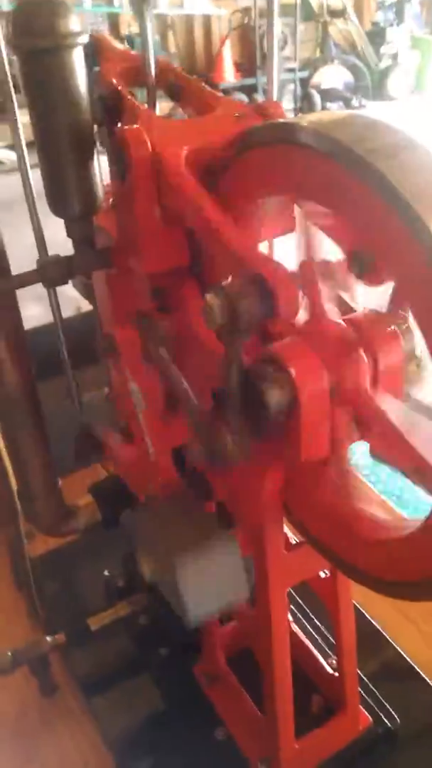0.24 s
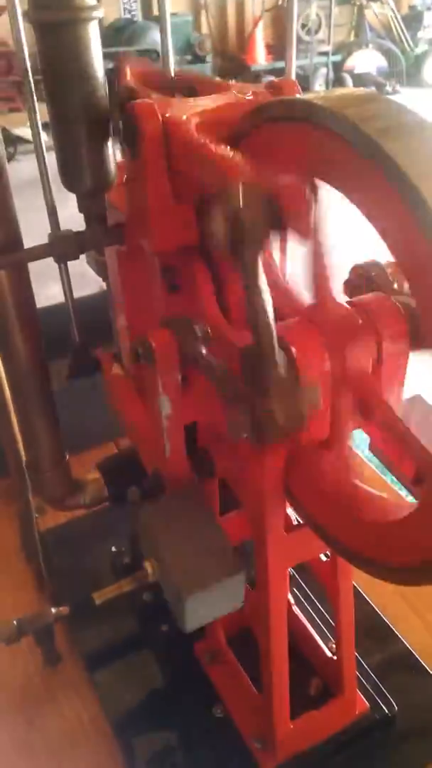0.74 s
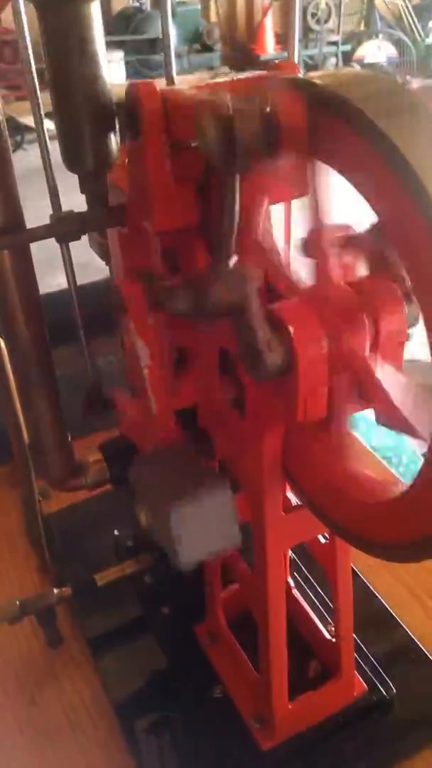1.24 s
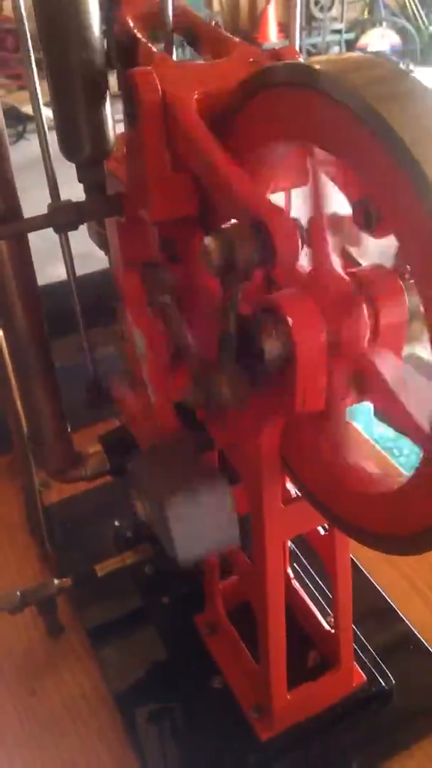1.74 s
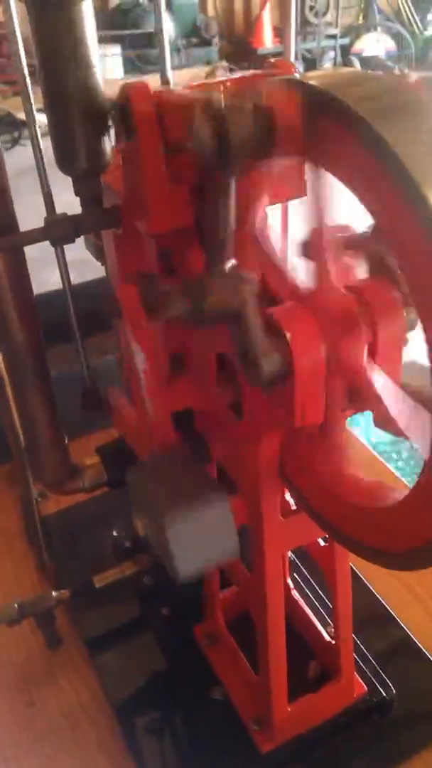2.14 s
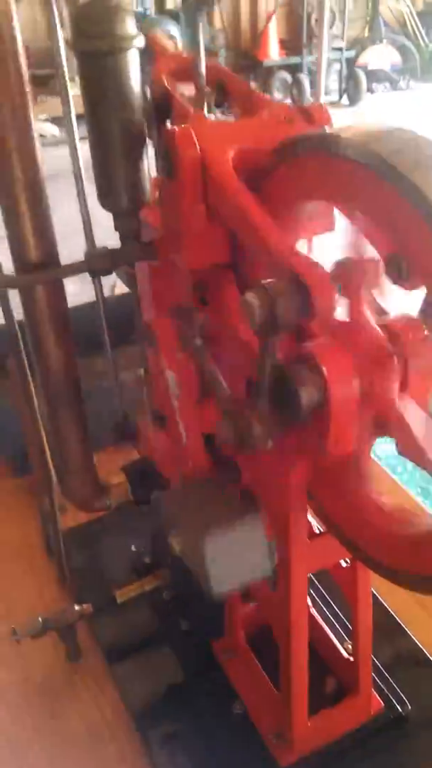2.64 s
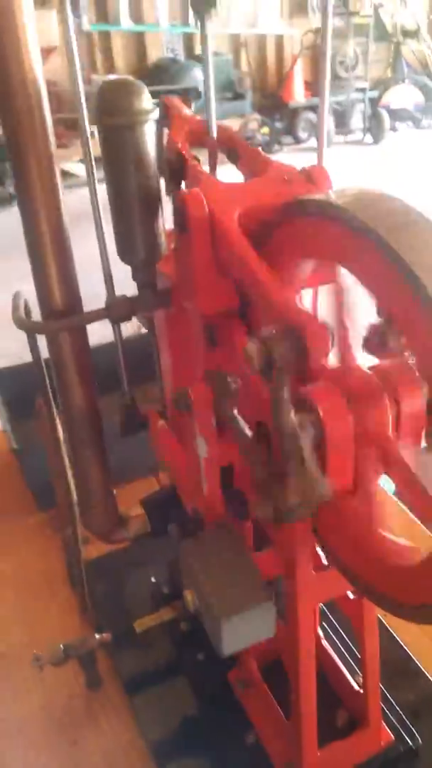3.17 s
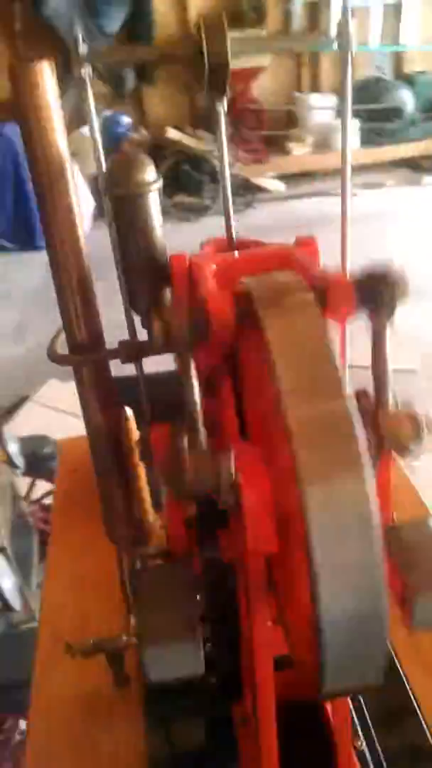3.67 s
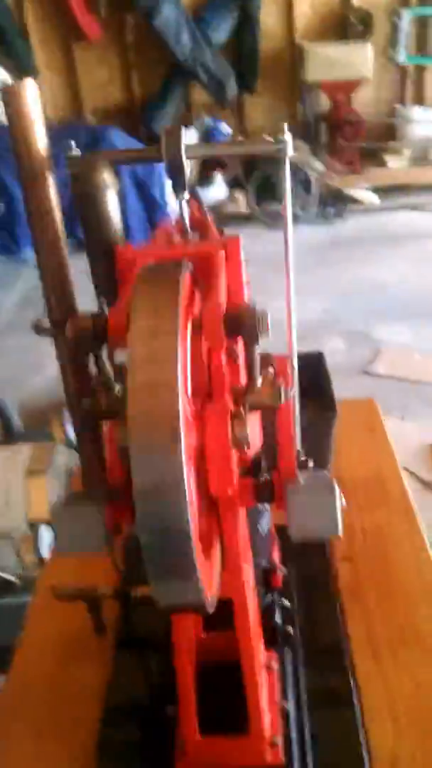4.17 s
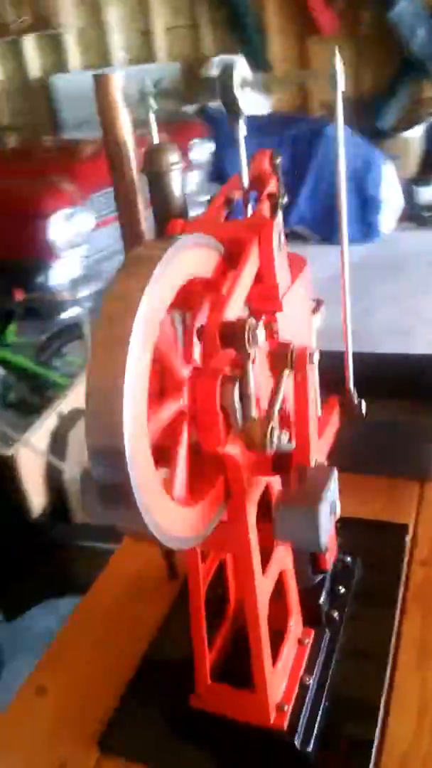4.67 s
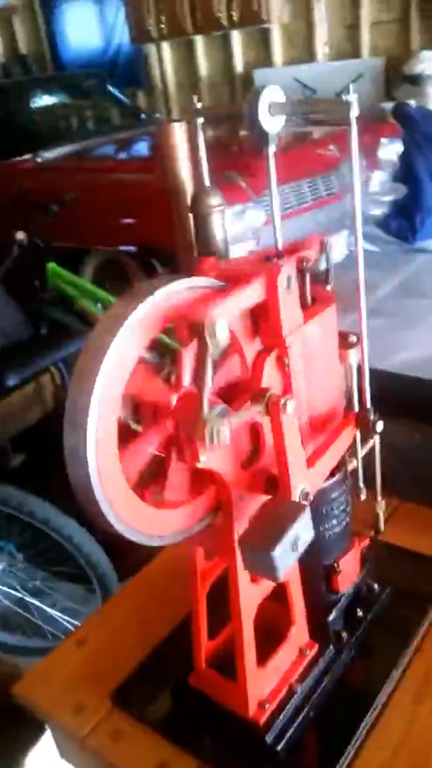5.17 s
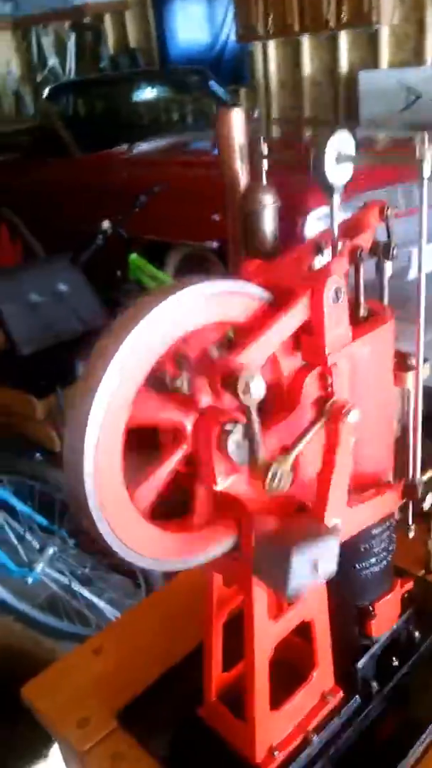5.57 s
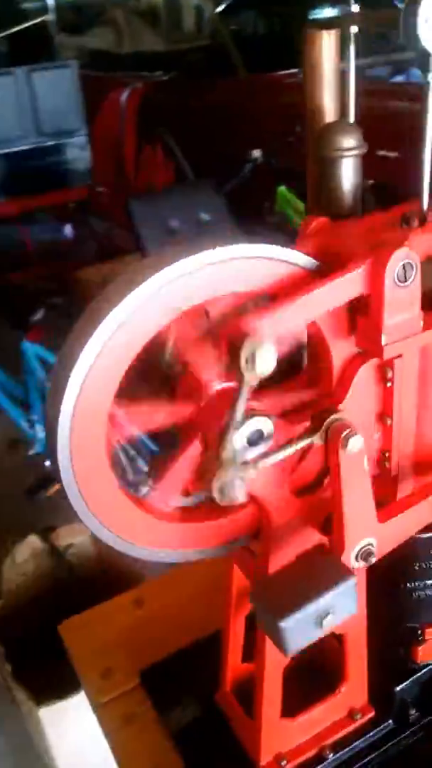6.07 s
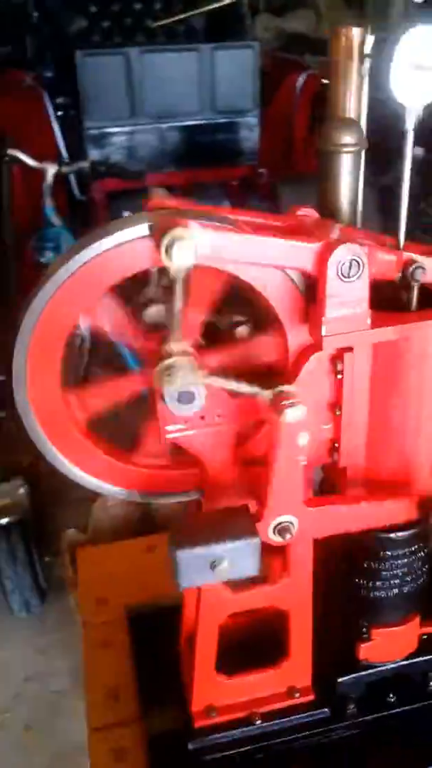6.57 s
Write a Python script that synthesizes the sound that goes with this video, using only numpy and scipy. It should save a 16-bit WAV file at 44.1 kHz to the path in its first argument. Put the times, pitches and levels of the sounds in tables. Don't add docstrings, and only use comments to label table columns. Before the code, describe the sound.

Close to a small running engine on a wooden table in a garage. About three times a second a dry metal knock lands, surrounded by crisp, irregular link ticks and soft low thuds from the table top. Bearings rustle steadily and a very faint motor hums far off. The hand-held stereo microphone moves around it, with faint shoe scuffs and handling bumps; the room echo is short.

```python
import sys
import numpy as np
from scipy import signal
from scipy.fft import rfft, irfft, next_fast_len
from scipy.io import wavfile

SR = 44100
rng = np.random.default_rng(int(sys.argv[2]) if len(sys.argv) > 2 else 0)


def put_to_file(sound):
    columns = np.atleast_2d(sound).T
    safe = np.clip(columns, -1, 1)
    whole_steps = np.round(safe * 32767)
    wavfile.write(sys.argv[1], SR, whole_steps.astype(np.int16))


def nominal_scale(level):
    x = np.asarray(level, float) / 20
    return 10 ** x


N = 300482

# frequency_hz, density_db (per Hz)
RUNNING_COLOUR = [(25, -8.5), (70, -12.5), (180, -15.5), (280, -3), (420, -13.5), (1200, -17), (1600, -20),
                  (2300, -20.5), (3600, -21.5), (6000, -27), (9000, -27), (15000, -35)]
# cycles_per_turn, depth_db, angle_rad
RUB_BY_ANGLE = [
    (1, 0.5, 3),
    (3, 1, 0.69),
    (4, 0.94, 1.64),
]
# frequency_hz, density_db (per Hz)
WIND_COLOUR = [(20, 0), (45, -2), (70, -9), (200, -17), (500, -32), (15000, -70)]
# frequency_hz, density_db (per Hz)
HISS_COLOUR = [(600, -15), (1300, 7), (1900, -10), (2500, 0), (4000, -28), (8000, 2), (15000, -6)]
# time_s, pitch_hz, level_db
MOTOR_COURSE = [(0, 78, -54), (.23, 79, -44.5), (1.01, 79.5, -48), (3.5, 86.1, -48), (4.1, 87, -48.5),
                (5.35, 88, -55.5), (6.81, 80, -60)]
# full_weight_s, level_db, lean_in_s, lift_off_s
SCUFFS = [
    (3.654, -51, 0.033, 0.014),
    (3.977, -49, 0.022, 0.076),
    (6.58, -51.5, 0.097, 1),
]
# frequency_hz, density_db (per Hz)
SCUFF_COLOUR = [(300, -17), (1000, -18), (3500, -14.5), (7000, -15), (15000, -23.5)]
# crest_s, level_db
FINGER_BUMPS = [(0.133, -20), (0.219, -26), (0.291, -28), (0.524, -20), (0.548, -29), (1.178, -30.0),
                (1.255, -20), (1.331, -30), (1.419, -24), (1.817, -20), (2.52, -30), (3.355, -21),
                (3.404, -16), (3.432, -25), (3.456, -14), (3.497, -23), (3.525, -22), (3.553, -32),
                (3.88, -24), (5.993, -30), (6.295, -30)]
# frequency_hz, level_db, t60_s
BODY_MODES = [(193, -2, 0.13), (381, -4, 0.21), (451, 1.5, 0.1), (552.4, -5.5, 0.51), (721, -6, 0.079),
              (1164, -4, 0.17), (1334, -8, 0.047), (3760, -17, 0.014), (5850, -6.5, 0.015),
              (8500, -10, 0.0073)]
# crest_turn_share, pitch_hz, upward_scoop (0-1)
PUSHES = [
    (0.075, 286.6, 0.13),
    (0.691, 267, 0.59),
    (0.825, 287, 0.13),
]
# recoil_db, lead_in_db, main_db
PUSH_LEVELS = [(-68, -21.5, -29), (-25.5, -19.5, -18), (-28, -23.5, -23), (-27.5, -22, -20.5),
               (-27.5, -24.5, -24), (-30, -26, -20), (-31, -26, -23), (-24.5, -28.5, -26.5),
               (-26.5, -25, -23.5), (-26, -31, -20), (-26.5, -23.5, -21.5), (-18, -24, -21.5),
               (-25, -24.5, -19.5), (-22, -28, -21), (-20.5, -27, -22), (-23, -29.5, -20.5),
               (-23, -26, -27), (-23, -25.5, -22), (-20.5, -32, -21), (-23, -29, -22), (-19, -26, -22.5),
               (-25, -32, -24), (-24.5, -24.5, -23.5), (-15, -60, -60)]
# crest_s, level_db
ROCKS = [(0.063, -30.5), (0.361, -28), (0.657, -29), (.689, -30), (0.949, -26), (1.271, -36), (1.524, -30),
         (1.572, -23.5), (1.826, -27.5), (2.146, -26), (2.446, -24.5), (2.723, -24.5), (3.015, -26),
         (3.048, -29), (3.314, -27.5), (3.354, -32), (3.641, -24.5), (3.925, -25), (4.259, -26),
         (4.508, -27), (4.838, -26), (5.08, -32), (5.112, -29), (5.337, -41), (5.693, -28.5),
         (5.952, -25.5), (5.983, -25.5), (6.24, -25.5), (6.55, -25.5), (6.593, -32.5)]
# start_s, level_db
ROD_PINGS = [(0.0084, -58), (0.3097, -57), (0.6095, -71), (0.9103, -57), (1.21, -49.5), (1.511, -59),
             (1.8078, -62), (2.106, -72), (2.4034, -63), (2.703, -59)]
# start_s, snap_db, pin_rattle_db, snap_centre_hz, top_edge_db
EARLY_TICKS = [(0.0335, -41.5, 6, 5880, -12), (0.0623, -32, -2, 8900, -14), (0.1224, -32, -14, 5860, -26),
               (0.1748, -35.5, 2.5, 5700, -21), (0.2805, -45, -9, 6620, -3), (0.3077, -33, -0.5, 9650, -14),
               (0.3374, -36, 2, 5990, -16), (0.383, -39, -1, 6180, -5), (0.4214, -31.5, -4, 5600, -20),
               (0.472, -32, -2.5, 6170, -17), (0.5831, -48, -10, 6480, -5), (0.609, -40, 3, 4730, -14),
               (0.634, -32.5, -2, 5990, -17), (0.701, -32, -9, 6190, -7), (0.7245, -30.5, -1, 7400, -16),
               (0.7677, -35.5, 2, 5960, -22), (0.9093, -37, -3.5, 9650, -14),
               (0.9342, -25.5, -13, 5820, -20), (0.9914, -31, -10, 6730, -11), (1.0223, -45, -17, 5820, -24),
               (1.0665, -38, -1, 5570, -15), (1.1117, -50, -2, 6740, -6), (1.1762, -48, -14, 6050, 2),
               (1.1956, -48, -12, 5990, -16), (1.2084, -31.5, 0.5, 9650, -18), (1.2338, -26, -10, 7970, -19),
               (1.261, -40, -9, 8580, -7), (1.2744, -47, -16, 6440, -6), (1.319, -54, -19, 5830, -13),
               (1.3653, -31.5, -4.5, 5730, -25), (1.4107, -49, -10, 6600, -18), (1.482, -48, -8, 6540, -7),
               (1.508, -39.5, 0.5, 9570, -20), (1.5344, -50, -8, 5730, -19), (1.5687, -29, -6.5, 6760, -28),
               (1.5968, -30.5, -6.5, 5660, -10), (1.672, -34.5, -8, 6050, -19),
               (1.8332, -39, -16, 5910, -23), (1.8941, -36, -3, 5810, -4), (1.918, -31, -0.5, 5750, -18)]
# start_s, snap_db, pin_rattle_db, snap_centre_hz, top_edge_db
MIDDLE_TICKS = [(1.9659, -29.5, -6, 6130, -22), (2.0083, -49, -13, 7070, -12), (2.0892, -44, -7, 5880, -3),
                (2.1301, -40, -1, 5800, -11), (2.175, -40.5, -2, 6430, -7), (2.2164, -40, -3, 5930, -15),
                (2.4029, -40.5, 3.5, 9660, -17), (2.4952, -35, -8.5, 5750, -7),
                (2.5333, -39.5, -3.5, 6030, -7), (2.7007, -39, 2, 9640, -12), (2.7262, -31, -23, 7360, -16),
                (2.7556, -39, 4.5, 8690, -15), (2.791, -35, -13, 5760, -7), (2.81, -34.5, -6, 6030, -14),
                (2.8264, -39.5, -0.5, 8030, -12), (2.8585, -30.5, -9.5, 6140, -23),
                (2.9502, -25.5, -8, 8500, -18), (2.9776, -43, 4, 5870, -5), (3.004, -34.5, -1, 5810, -15),
                (3.0789, -35, -7, 5960, -11), (3.107, -31, -14, 6180, -20), (3.1547, -30, -11.5, 6170, -22),
                (3.269, -40, -2, 5280, -7), (3.2928, -42, -1.5, 4750, -15), (3.3189, -34, -13, 5720, -19),
                (3.3467, -36, -27, 8690, -15), (3.377, -39, -19, 7130, -6), (3.4017, -32, -16, 6150, -15),
                (3.4407, -39, -4, 5720, -13), (3.4531, -28.5, -8.5, 6250, -20), (3.5654, -44, -2, 5670, -8),
                (3.6127, -33.5, -5, 5480, -16), (3.6356, -30, -13, 5380, -21), (3.6999, -38.5, 1.5, 5780, -14),
                (3.749, -31, -6.5, 5900, -22), (3.8831, -35.5, 0, 9050, -17), (3.908, -37, -4, 6660, -17),
                (3.9509, -38, -9, 6600, -14), (3.9664, -25.5, -20, 6170, -15), (4.2003, -37, -0.5, 9630, -9)]
# start_s, snap_db, pin_rattle_db, snap_centre_hz, top_edge_db
LATE_TICKS = [(4.2695, -34, -8, 6630, -16), (4.349, -34, -12, 6200, -20), (4.4947, -32, -6, 8730, -16),
              (4.5461, -44, -19, 5800, -8), (4.5774, -51, -22, 5430, -13), (4.63, -45, -16, 6230, -18),
              (4.7558, -38, -1, 8260, -10), (4.8487, -34, -4, 4900, -9), (4.884, -32.5, -15, 6490, -15),
              (4.9233, -31.5, -10, 5980, -23), (5.0605, -38, -1, 7960, -18), (5.15, -33, -20, 4700, -8.5),
              (5.1684, -39, 0, 8830, -8), (5.191, -39, -17, 5470, -10), (5.3233, -41, -6, 5700, -9),
              (5.3492, -44, 4, 5500, -15), (5.408, -40, -16, 8500, -11), (5.4416, -32.5, -12, 5800, -8),
              (5.4817, -35, -14, 5810, -11), (5.641, -43, -1, 4750, -19), (5.7287, -31, -10, 5700, -11),
              (5.7705, -38, -12, 5550, -9), (5.795, -34, -9, 6140, -22), (5.9254, -39, -5, 8450, -11),
              (5.9788, -37, -20, 5760, -9), (6.0062, -32.5, -22, 5670, -10), (6.032, -40, -15, 5910, -10),
              (6.079, -34, -8, 5820, -19), (6.125, -28, -21, 8700, -25), (6.193, -46, -15, 6060, -3),
              (6.226, -29.5, -10, 6500, -11), (6.2945, -27.5, -23, 8500, -16), (6.3644, -40, -13, 6070, -18),
              (6.378, -25, -19, 6060, -31), (6.5141, -33, -19, 5830, -13), (6.574, -36, -13, 5790, -6),
              (6.664, -46, -13, 6210, -16), (6.7725, -31, -7, 5850, -15), (6.7838, -22, -14, 5760, -27)]
# start_s, snap_db, pin_rattle_db, snap_centre_hz, top_edge_db
EXTRA_TICKS = [(0.0034, -38.5, -1.5, 9660, -9), (0.07, -36.5, 0.5, 4560, -13), (0.132, -45, -4, 7530, -19),
               (0.4946, -49, 10, 5870, -10), (0.662, -39, 3, 5520, -17), (0.7396, -43, 4.5, 5760, -6),
               (1.075, -40, -1.5, 5600, -13), (1.3046, -53, -18, 5830, -7), (2.069, -50, -13, 5630, -5),
               (2.1056, -46, 0, 4700, -6), (2.1644, -45, 3, 6030, -11), (2.2592, -38, 1.5, 5660, -16),
               (2.379, -49, -18, 4690, -4), (2.428, -37, -9, 5880, -18), (2.5153, -35, -4, 5710, -14),
               (2.8993, -51, -20, 5860, -21), (3.5882, -36, -1.5, 4720, -18), (3.659, -47, -14, 6270, -18),
               (3.68, -32, -6, 5800, -20), (3.7698, -43, 4, 8770, -14), (4.0398, -36, -4, 6240, -25),
               (4.2337, -42, -3, 6450, -15), (5.213, -37, -24, 5640, -21), (5.5034, -36, -10, 6940, -15),
               (5.6635, -42, 1, 5500, -18), (6.2114, -40, -10, 5630, -11), (6.2497, -32, -19, 6420, -13)]
# low_hz, high_hz
SNAP_BANDS = [
    (4800, 6300),
    (6800, 9000),
    (10500, 20000),
]
SNAP_RISE_S = [.003, .0028, .002]
# start_s, level_db, frame_ring_db, bright_ring_db, favoured_pitch_hz
KNOCKS = [(0.2323, -19.5, -3, -14.5, 1480), (0.534, -20, 0.5, -8, 680), (0.8319, -19, -3, -11.5, 1186),
          (1.1327, -21.5, 0, -12, 675), (1.4335, -19, -4.5, -10.5, 738), (1.732, -19, -8, -3, 1350),
          (2.0298, -20, -2, -14.5, 1440), (2.3277, -21.5, -3.5, -8.5, 1210), (2.6263, -18, -1, -11, 1240),
          (2.9233, -19.5, -7, -11, 740), (3.2196, -18, -6.5, -12, 1150), (3.5134, -18, -2.5, -15.5, 1182),
          (3.8091, -21.5, 1, -14, 740), (4.1029, -19, -2, -20, 880), (4.3968, -20.5, -3, -13.5, 1013),
          (4.6893, -25.5, 2.5, -10, 875), (4.9832, -22.5, -1, -12.5, 1220), (5.2761, -23, -0.5, -9.5, 740),
          (5.5652, -19, -2.5, -15, 1380), (5.8551, -20, -1, -10, 1155), (6.1446, -20.5, -3, -10, 1300),
          (6.4318, -21, -0.5, -10.5, 745), (6.721, -19, -3.5, -16, 1300)]
# frequency_hz, level_db, t60_s
FRAME_MODES = [(460, -4, .04), (590, -3, .035), (740, -2, .035), (880, -3, .03), (1020, -5, .025),
               (1110, -5, .02), (1190, -3, .022), (1260, -5, .02), (1340, -3, .022), (1480, -3, .022),
               (1600, -7, .015), (1750, -8, .015)]
# frequency_hz, level_db, t60_s
PIN_MODES = [(2200, -4, .008), (2550, -2, .008), (2850, -2, .008), (3150, -2, .008), (3450, 0, .01),
             (3800, -1, .009), (4200, -4, .007), (4700, -3, .009)]
# frequency_hz, level_db, t60_s
BRIGHT_MODES = [(5400, -5, .008), (5900, -3, .008), (6500, -4, .01), (7100, 0, .007), (7900, -4, .007),
                (8550, 1, .009), (9500, -7, .005), (11500, -10, .004), (13500, -7, .004), (14700, -5, .004)]

T = np.arange(N) / SR
SIZE = next_fast_len(N + SR)
HZ = np.maximum(np.fft.rfftfreq(SIZE, 1 / SR), 1)
PORT_S = .00039


def drift(rate_hz):
    r = np.exp(-80 * np.pi * rate_hz / SR)
    slow = signal.lfilter([1], [1, -2 * r, r * r], rng.standard_normal(N // 40 + 2002))[2000:]
    return np.interp(np.arange(N) / 40, np.arange(len(slow)), slow / slow.std())


def noise(colour, uneven_db=0, count=90):
    hz, db = np.transpose(colour)
    places = np.linspace(0, 1, count)
    bumps_db = np.interp(np.sqrt(HZ / HZ[-1]), places, uneven_db * rng.standard_normal(count))
    gain_db = np.interp(np.log(HZ), np.log(hz), db) + bumps_db * (HZ > 1500)
    x = irfft(rfft(rng.standard_normal(SIZE)) * nominal_scale(gain_db), SIZE)[:N]
    return x / x.std()


def ring(clicks, hz, t60):
    r, w = nominal_scale(-60 / (t60 * SR)), 2 * np.pi * hz / SR
    return signal.lfilter([0, np.sin(w)], [1, -2 * r * np.cos(w), r * r], clicks + 1e-18)


def at_ports(x, cosine):
    half = np.exp(1j * np.pi * HZ * PORT_S * cosine)
    return irfft(rfft(x, SIZE) * np.array([half, half.conj()]), SIZE)[:, :N]


def all_round(make, count=6):
    cosines = (2 * np.arange(count) + 1) / count - 1
    return sum(at_ports(make(), c) for c in cosines) / np.sqrt(count)


def chatter(times, level_db, rise_s, fall_s, per_s):
    length = 1600
    t, out = T[:length], np.zeros(N + length)
    shape = (1 - np.exp(-t / rise_s)) ** 2 * np.exp(-t / fall_s)
    size = (len(times), length)
    contacts = shape * rng.standard_normal(size) * (rng.random(size) < per_s / SR)
    expected = np.sum(shape ** 2) * per_s / SR
    energy = np.sum(contacts ** 2, axis=1, keepdims=True) + 1e-9
    contacts = contacts * np.sqrt(expected / energy)
    for s, db, row in zip(np.maximum(times, 0), level_db, contacts):
        i = round(s * SR)
        out[i:i + length] += nominal_scale(db) * row
    return out[:N]


def struck(modes, times, level_db, rise_s, fall_s, per_s, spread_db):
    luck = rng.standard_normal((len(times), len(modes)))
    out = 0
    for k, (hz, db, t60) in enumerate(modes):
        clicks = chatter(times, level_db + db + spread_db * luck[:, k], rise_s, fall_s, per_s)
        out = out + ring(clicks, hz, t60)
    return out


def swells(rows, crest_s):
    out, phase = np.zeros(N + SR), rng.uniform(0, 2 * np.pi, (len(rows), 1))
    u = T[:SR // 5] / crest_s
    envelope = (u * np.exp(1 - u)) ** 6.9
    for (s, db, hz, scoop), start in zip(rows, phase):
        warped_s = crest_s * (u + scoop * (np.exp(-u) + u / np.e))
        i = max(round((s - crest_s) * SR), 0)
        out[i:i + len(u)] += nominal_scale(db) * envelope * np.sin(2 * np.pi * hz * warped_s + start)
    return out[:N]


def turn_starts():
    s = np.array(KNOCKS)[:, 0]
    return np.r_[2 * s[0] - s[1], s, 2 * s[-1] - s[-2]]


def wind():
    return np.array([noise(WIND_COLOUR) * nominal_scale(db + 2 * drift(7.9)) for db in (-79, -74)])


def motor_hum():
    s, hz, db = np.transpose(MOTOR_COURSE)
    hz, db = np.interp(T, s, hz), np.interp(T, s, db)
    return np.sqrt(2) * nominal_scale(db + drift(2)) * np.sin(2 * np.pi * np.cumsum(hz) / SR)


def running():
    starts = turn_starts()
    angle = 2 * np.pi * np.interp(T, starts, np.arange(len(starts)))
    rub_db = sum(db * np.cos(round(k) * angle - rad) for k, db, rad in RUB_BY_ANGLE)

    def one():
        return noise(RUNNING_COLOUR, uneven_db=5) * nominal_scale(5.06 * drift(16.0))
    return nominal_scale(-46 + rub_db) * all_round(one, count=5)


def scuffs():
    gate = sum(nominal_scale(db) * np.exp(-np.abs(T - s) / np.where(T < s, rise, fall))
               for s, db, rise, fall in SCUFFS)
    return nominal_scale(13) * gate * all_round(lambda: noise(SCUFF_COLOUR) * nominal_scale(3.4 * drift(33)), count=3)


def finger_bumps():
    rows = [(s, db - 16, 135, 0) for s, db in FINGER_BUMPS]
    return swells(rows, crest_s=0.0068) * nominal_scale([[-30], [0]])


def body():
    def one():
        drive = rng.standard_normal(N) * nominal_scale(3.2 * drift(18.0))
        return sum(nominal_scale(db) * ring(drive, hz, t60) / np.sqrt(t60 * SR) for hz, db, t60 in BODY_MODES)
    return nominal_scale(-44.5) * all_round(one, count=3)


def table_thuds():
    share, hz, scoop = np.transpose(PUSHES)
    starts = turn_starts()
    times = starts[:-1, None] + np.diff(starts)[:, None] * share
    s, db = times[:len(PUSH_LEVELS)].ravel(), np.ravel(PUSH_LEVELS)
    pushes = np.c_[s, db, np.resize(hz, len(s)), np.resize(scoop, len(s))]
    rocks = [(s, db, 286, 0.13) for s, db in ROCKS]
    rows = np.r_[pushes, rocks]
    waver_hz, sag_hz_per_s = 5.6, 1.37
    rows[:, 2] += waver_hz * rng.standard_normal(len(rows)) - sag_hz_per_s * rows[:, 0]
    return swells(rows, crest_s=.029)


def rod_pings():
    s, db = np.transpose(ROD_PINGS)
    taps = np.zeros(N)
    taps[np.round(s * SR).astype(int)] = nominal_scale(db + 19)
    return ring(taps, 9652, t60=0.055)


def loose_play(count=6):
    when, force, pitch = rng.random((count, 3)).T
    edge_db = -8 + 9.0 * pitch
    return np.c_[when * N / SR, -48 + 5.0 * force, -8 + 6.0 * force, 5000 + 4000 * pitch, edge_db]


def link_ticks(side, count=3):
    s, db, pin_db, hz, top_db = np.r_[EARLY_TICKS, MIDDLE_TICKS, LATE_TICKS, EXTRA_TICKS, loose_play()].T
    band, rise_s = SNAP_BANDS[side], SNAP_RISE_S[side]
    share_db = -9 * (np.log(hz / np.sqrt(np.prod(band))) / 0.6) ** 2
    if side == count - 1:
        share_db = top_db + 4.5
    snap = chatter(s - 1.5 * rise_s, db + share_db + 14.5, rise_s=rise_s, fall_s=0.0033, per_s=5100)
    snap = signal.sosfilt(signal.butter(3, band, "band", fs=SR, output="sos"), snap)
    s, db = s[side::count], (db + pin_db)[side::count]
    pin = struck(PIN_MODES[3:] + BRIGHT_MODES[:3], s - .003, db - 14.0,
                 rise_s=0.0021, fall_s=0.0051, per_s=2400, spread_db=4.0)
    frame = struck(FRAME_MODES, s, db - 28.5, rise_s=0.0032, fall_s=0.0081, per_s=3000, spread_db=-6.5)
    return snap + pin + frame


def crank_knocks():
    s, db, frame_db, bright_db, favour_hz = np.transpose(KNOCKS)
    pin = struck(PIN_MODES, s - .005, db - 3.0, rise_s=0.0061, fall_s=0.0049, per_s=4400, spread_db=3.0)
    bright = struck(BRIGHT_MODES, s - .004, db + bright_db + 6.5,
                    rise_s=0.0044, fall_s=0.0044, per_s=5400, spread_db=1.5)
    frame = 0
    for mode in FRAME_MODES:
        lift_db = 6 * np.exp(-(np.log(mode[0] / favour_hz) / .09) ** 2)
        frame = frame + struck([mode], s - .001, db + frame_db - 17.5 + lift_db,
                               rise_s=0.0039, fall_s=0.0077, per_s=6000, spread_db=2.5)
    return pin + frame, bright


def garage(x):
    t, t60_s = T[:SR // 2], 0.28
    fade = nominal_scale(-60 * t / t60_s) * np.clip(t / 0.0051, 0, 1)
    dull = signal.butter(1, 5000, fs=SR)

    def echo():
        response = signal.lfilter(*dull, rng.standard_normal(len(t)) * fade)
        return signal.fftconvolve(x, response)[:N]
    return all_round(echo, count=5) / np.sqrt(np.sum(fade ** 2))


def scene():
    background = running() + body() + scuffs() + wind() + finger_bumps()
    table = nominal_scale(-9.0) * table_thuds()
    links = [link_ticks(side) for side in range(3)]
    low, bright = crank_knocks()
    bright = bright + rod_pings()
    near = nominal_scale(0.5) * (at_ports(low, 0.13) + at_ports(bright, 0.068))
    near += at_ports(table, -0.23) + at_ports(nominal_scale(-7.0) * motor_hum(), -0.92)
    near += nominal_scale(12.0) * sum(at_ports(x, c) for x, c in zip(links, (-.35, .12, .55)))
    room = garage(nominal_scale(-6.5) * (low + bright + sum(links)) + nominal_scale(-8.5) * table)
    return near + room + background


def top_cut(x):
    return signal.sosfilt(signal.butter(12, 16470, fs=SR, output="sos"), x)


def record(dry):
    front, back = rfft(dry, SIZE)
    back = back * nominal_scale(-18 / (1 + (8500 / HZ) ** 3.0))
    treble_share = 0.033
    reach = treble_share + (1 - treble_share) / (1 + (HZ / 4800) ** 5)
    late = .99 * np.exp(-2j * np.pi * HZ * PORT_S) * reach
    bass_lift = (800 + 1j * HZ) / (60 + 1j * HZ)
    left, right = front - late * back, nominal_scale(1.2) * (back - late * front)
    beams = irfft(np.array([left, right]) * bass_lift, SIZE)[:, :N]
    beams += np.array([nominal_scale(db) * noise(HISS_COLOUR) for db in (-60, -59)])
    beams = signal.sosfilt(signal.cheby2(12, 45, 16250, fs=SR, output="sos"), beams)
    return top_cut(beams)


dry = scene()
out = record(dry)
put_to_file(out)
```